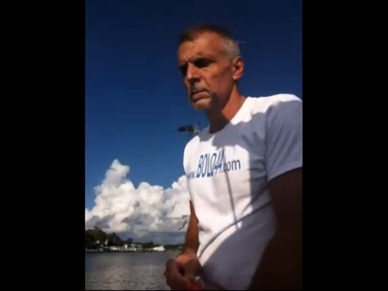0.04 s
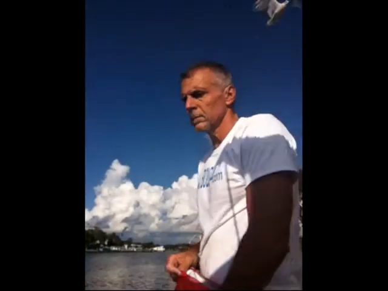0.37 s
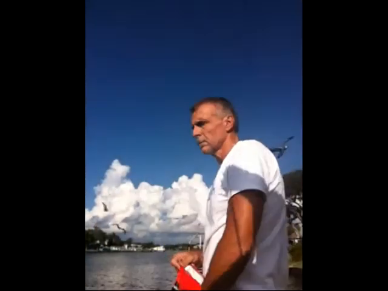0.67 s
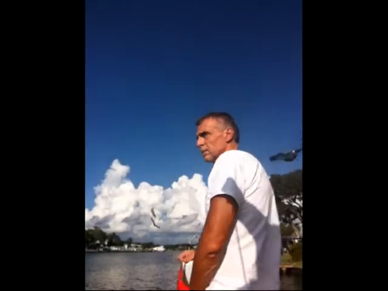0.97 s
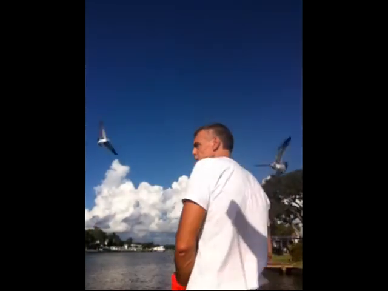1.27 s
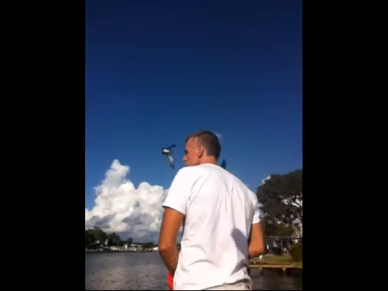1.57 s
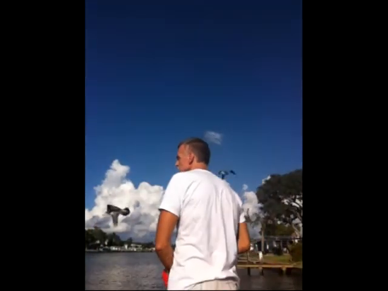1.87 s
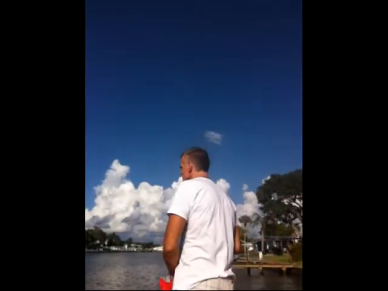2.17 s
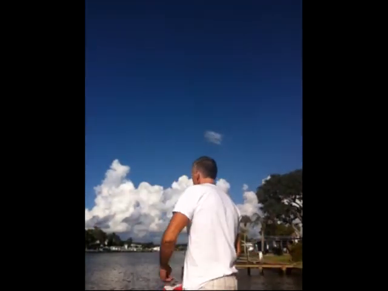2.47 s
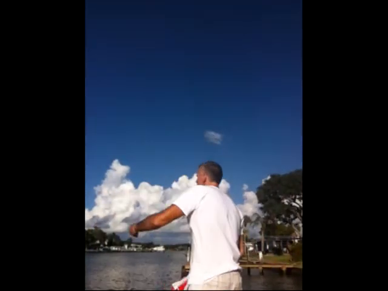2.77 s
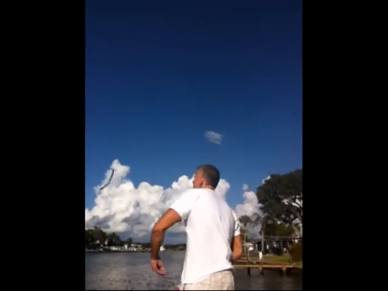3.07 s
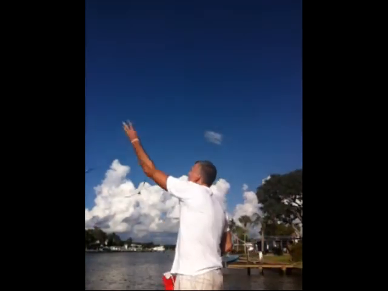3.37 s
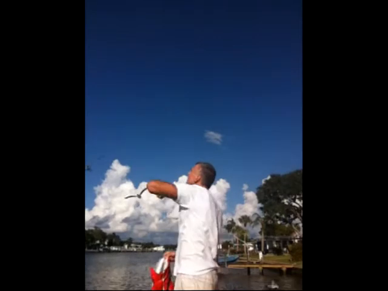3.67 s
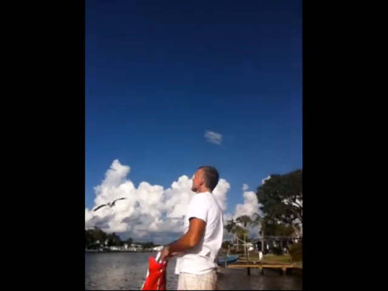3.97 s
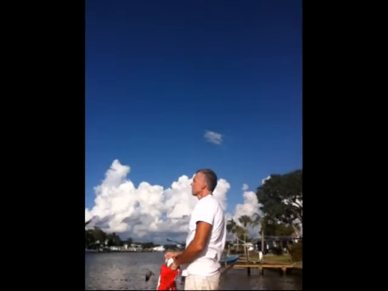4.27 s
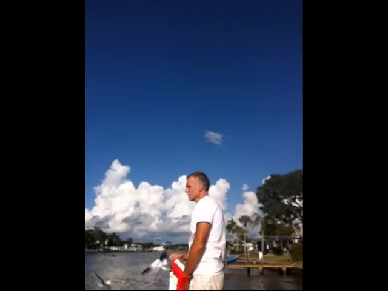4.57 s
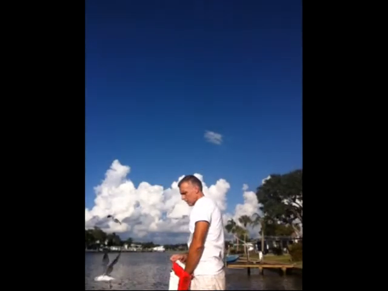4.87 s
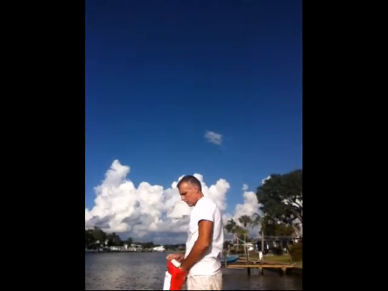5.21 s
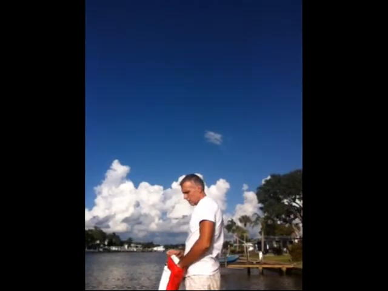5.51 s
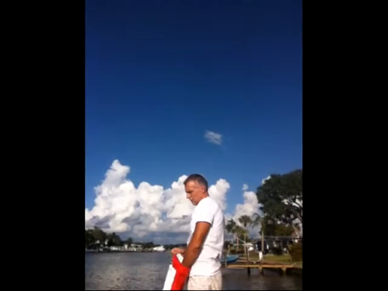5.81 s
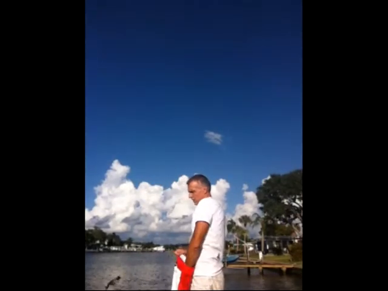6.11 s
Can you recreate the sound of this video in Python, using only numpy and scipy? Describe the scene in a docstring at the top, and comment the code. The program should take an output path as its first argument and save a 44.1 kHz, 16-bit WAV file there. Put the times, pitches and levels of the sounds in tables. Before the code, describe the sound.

Seagulls call throughout over a faint wash of water and air, their cries echoing slightly off the shore. A snack bag crackles in the first half second, with a low puff of wind on the microphone. A young gull squeals thinly at 0.5 seconds, followed by clear mews and another gust. From 1.7 to 2.6 seconds comes a laughing run of short yelps, ending in a sinking wail. Wind rumbles and thumps hardest between 2.6 and 3.4 seconds, among more mews and reedy groans. Around 4 seconds a loud cry and two harsh, close screeches overlap. Near 5 seconds come a yip, a nasal bark and a high warbling whistle. A dull thud lands at 5.1 seconds and a short hollow knock at 5.5. Light bag crinkles, soft clucks, a brief squawk and a peep finish at about 6 seconds.

```python
"""Hungry gulls on the waterfront

Gulls cry for food: long mews, harsh squawks, short yelps and the thin whistles of young birds.
Each call is a harmonic buzz of the syrinx with a breathy rasp, thrown back faintly by the shore.
Gusts buffet the microphone, a snack bag crackles, and a dull thud and a hollow knock come late.
A low wash of water and air lies under it all."""
import sys
import numpy as np
from scipy import signal
from scipy.fft import rfft, irfft, next_fast_len
from scipy.io import wavfile
from scipy.ndimage import uniform_filter1d, map_coordinates

SR = 44100
rng = np.random.default_rng(int(sys.argv[2]) if len(sys.argv) > 2 else 0)


def to_wav(sig):
    """Store sig (one row per channel, or 1-D mono) as 16-bit WAV at the path in sys.argv[1].

    Samples outside -1..1 are clipped; the rate is SR.
    """
    pcm = np.clip(np.atleast_2d(sig), -1, 1) * 32767
    pcm = np.round(pcm).astype(np.int16)
    wavfile.write(sys.argv[1], SR, pcm.T)  # frames by channels


N = 275625
EDGE_HZ = 15900  # top of the spectrum
# an almost unbent gesture for arch(), shared by cracked mews, brays and pips
FLAT_SHAPE = dict(scoop=0.024, drop=0.035, onset_db=-24, end_db=-58,
                  onset_rasp=.05, end_rasp=0.23, fray_db=-14)


def gain_of(db):
    """Decibels to amplitude."""
    return 10 ** (np.asarray(db) / 20)


def evened(x):
    """Scales to rms 1."""
    return x / np.sqrt(np.mean(x ** 2) + 1e-20)


def read(points, hz):
    """Reads an EQ curve on a log-frequency axis."""
    f, value = np.transpose(points)
    return np.interp(np.log(hz + 1), np.log(f + 1), value)


def add(mix, s, sound):
    """Mixes a sound in at time s."""
    part = mix[max(round(s * SR), 0):][:len(sound)]
    part += sound[:len(part)]


def noise(colour, size):
    """Noise at rms 1, coloured by rows of f/Hz, level/dB."""
    n = next_fast_len(size)
    eq = gain_of(read(colour, np.fft.rfftfreq(n, 1 / SR)))
    return evened(irfft(rfft(rng.standard_normal(n)) * eq, n)[:size])


def wander(hz, size):
    """Random modulation up to about hz, rms near 1."""
    knots = rng.standard_normal(4096)
    return map_coordinates(knots, [np.arange(size) * 2 * hz / SR], order=1, mode="wrap") * np.sqrt(3 / 2)


def call(contour, harmonics_db, jitter, rasp_db, tilt_db, beak=((1, 0),), ending_db=None,
         jitter_hz=500, flutter=0.0045, shimmer_db=4.5, split=0.15):
    """The syrinx buzzes, shaking and hissing in puffs as it turns harsh; the beak colours both."""
    open_throat = [(290, -68), (500, -20), (1320, -5), (1440, 7), (2040, -1), (2730, -0.5), (7100, -9.5),
                   (11000, -27), (16000, -30)]  # colour of the hiss: f/Hz, level/dB
    s, *columns = np.transpose(contour)
    t = np.arange(s[0] - .004, s[-1] + .004, 1 / SR)
    hz, level_db, rasp = (np.interp(t, s, c) for c in columns)
    size, harsh = len(t), np.clip(rasp, 0, 1)
    shake = 1 + flutter * wander(57.44, size) + jitter * harsh * wander(jitter_hz, size)
    hz = uniform_filter1d(hz, 260) * shake
    phase = 2 * np.pi * np.cumsum(hz) / SR
    # the timbre morphs towards ending_db, if given
    gains = gain_of(np.linspace(harmonics_db, ending_db or harmonics_db, size).T)
    tone = np.zeros(size)
    for k, gain in enumerate(gains, 1):
        colour = gain_of(2 * wander(22.96, size) + read(beak, k * hz)) * (k * hz < EDGE_HZ)
        tone += gain * colour * np.sin(k * phase + k * k)
    shimmer = evened(gain_of(shimmer_db * harsh * wander(300, size)))
    tone *= np.sqrt(2) / np.linalg.norm(gains, axis=0) * shimmer
    # a strained voice slips in and out of strong-weak cycles
    tone *= evened(1 + split * harsh * wander(44.1, size) * np.cos(phase / 2))
    # tilt_db tips the hiss, per octave
    throat = [(f, db + tilt_db * np.log2(f / open_throat[0][0]) + read(beak, f)) for f, db in open_throat]
    puffs = noise(throat, size) * (1 + 0.53 * np.cos(phase)) * gain_of(1.5 * wander(120, size))
    fade = signal.windows.tukey(size, min(0.009 * SR / size, 1))
    return t[0], fade * gain_of(level_db) * (tone + gain_of(rasp_db) * rasp * puffs)


def voice(contours, harmonics_db, level_db, **throat):
    """One throat sings each contour (t/s, f/Hz, level/dB, rasp) onto one track."""
    out = np.zeros(N)
    for contour in contours:
        add(out, *call(contour, harmonics_db, **throat))
    return gain_of(level_db) * out


def arch(start, length_s, hz, db, rise_s, fall_s, glide, swell_db, rasp,
         scoop, drop, onset_db, end_db, onset_rasp, end_rasp, fray_db):
    """A call's contour: it scoops up, glides and droops, with quiet, hoarse ends."""
    slew_s, catch_share, ease_db = 0.0243, 0.37, 1
    t = np.linspace(0, length_s, 128)
    along = t / length_s - .5
    opening = np.clip(1 - t / rise_s, 0, 1) ** 2
    closing = np.clip(1 - (length_s - t) / fall_s, 0, 1)
    # a weak rasp until the tone catches, part-way up the rise
    toneless = 1 / (1 + abs(t / (catch_share * rise_s)) ** 8)
    # ends quicker than slew_s barely bend the pitch; scoop, drop and glide are shares of it
    bend_in, bend_out = 1 - np.exp(-(np.array([rise_s, fall_s]) / slew_s) ** 2)
    sag = scoop * bend_in * opening + drop * bend_out * np.sin(np.pi / 2 * closing) ** 2
    pitch = hz * (1 + glide * along) * (1 - sag)
    level_db = db + swell_db * along + ease_db * opening + onset_db * toneless + end_db * closing ** 3
    hoarse = rasp * gain_of(fray_db * along) + onset_rasp * bend_in * toneless ** 2
    hoarse += end_rasp * closing ** 2
    return np.transpose([start + t, pitch, level_db, hoarse])


def arches(notes, **shape):
    """Contours for notes: t/s, length/s, f/Hz, level/dB, rise/s, fall/s, glide, swell/dB, rasp."""
    return [arch(*note, **shape) for note in notes]


def mews():
    """Clear mews that ring on the second harmonic, and one cracked mew."""
    clear, cracked = [(.755, 0.38, 1544, -38, 0.037, 0.16, 0.025, -4.5, 0.017),
                      (1.362, 0.14, 1312, -46, 0.07, 0.013, -0.015, -5, 0.036),
                      (1.567, 0.091, 1324, -45, 0.029, 0.028, 0.069, 2, 0.37),
                      (2.58, 0.22, 1590, -45.5, 0.047, 0.085, 0.096, -4, 0.097),
                      (3.024, 0.11, 1548, -34.5, 0.011, 0.0087, 0.056, 9.5, 0.021),
                      (3.143, 0.047, 1570, -38.5, 0.0089, 0.0049, 0.012, 11, 0.07),
                      (3.518, 0.11, 1540, -49.5, 0.016, 0.0089, 0.015, 0, 0.056),
                      (3.674, 0.11, 1536, -43, 0.013, 0.071, -0.018, -12, 0.018),
                      (4.115, 0.18, 1560, -44, 0.027, 0.021, -0.019, -8, 0.037)], [(.752, 0.164, 1015, -46.5, 0.036, 0.021, -0.025, -14, 0.18)]  # notes as in arches()
    clear_db, cracked_db = [-47, 9, -21.5, -2.5, -21, -15, -32, -21.5], [-41, 4.5, -13, -2, -15, -19, -4]  # level/dB per harmonic
    mewing = arches(clear, scoop=0.19, drop=0.19, onset_db=-30.5, end_db=-15,
                    onset_rasp=10.4, end_rasp=0.038, fray_db=-4)
    cracking = arches(cracked, **FLAT_SHAPE)
    return (voice(mewing, clear_db, level_db=1.5, jitter=0.037, rasp_db=-0.5, tilt_db=-2)
            + voice(cracking, cracked_db, level_db=3, jitter=0.047, rasp_db=-6, tilt_db=3))


def wails_and_cries():
    """Strained voices: wails that sink and fray, and short arched cries."""
    wails = [
        [(2.408, 1088, -45, 0.64), (2.421, 1281, -40, 0.54), (2.428, 1358, -28, 0.11), (2.45, 1386, -30, 0.18),
         (2.512, 1321, -28.5, 0.12), (2.535, 1346, -34, 0.28), (2.6, 1320, -36.5, 0.35),
         (2.69, 1254, -42, 0.35), (2.765, 1105, -51, 0.36)],
        [(4.1, 1183, -35, 0.18), (4.12, 1255, -34, 0.18), (4.14, 1291, -29.5, 0.31), (4.184, 1250, -28.5, 0.64),
         (4.198, 1180, -53, .4)],
    ]  # contours: t/s, f/Hz, level/dB, rasp
    cries = [(2.956, 0.083, 1420, -42.5, .03, 0.0074, 0.076, -7, 0.63),
             (3.435, 0.074, 1412, -46, 0.028, 0.0055, 0.1, -19, 0.59),
             (3.874, .225, 1273, -28, .058, 0.0117, -.08, -6.5, 0.059)]  # notes as in arches()
    wail_db, cry_db = [-5.5, 5.5, 0, 2, -2.5, -10, -10, -13, -11, -12.5, -16, -26], [-6.5, 6, 1, -6.5, -10, -14, -16.5, -22, -24, -19, -22, -30]  # level/dB per harmonic
    grain = dict(jitter=.034, jitter_hz=300, rasp_db=-5.5, flutter=.005, shimmer_db=4, split=.7)
    crying = arches(cries, scoop=.14, drop=0.22, onset_db=-17.5, end_db=-26,
                    onset_rasp=0.63, end_rasp=.15, fray_db=-11)
    return (voice(wails, wail_db, level_db=1, tilt_db=11, **grain)
            + voice(crying, cry_db, level_db=-0.4, tilt_db=-7.5, **grain))


def screeches_and_squawks():
    """A close gull screeches twice, its voice tearing; two brief squawks share the timbre."""
    screeches = [
        [(3.992, 430, -36, .4), (4.019, 545.7, -22, 0.44), (4.036, 515, -26.5, 1), (4.06, 483, -26.5, 0.76),
         (4.088, 488, -28, .9), (4.11, 577, -25, 0.55), (4.124, 626, -24, 0.97), (4.138, 620, -36, 0.87)],
        [(4.184, 606, -45, 0.64), (4.199, 576.4, -25, 0.16), (4.235, 531, -33.5, 0.55), (4.278, 392, -41, 1)],
    ]  # contours: t/s, f/Hz, level/dB, rasp
    squawks = [(.45, 0.026, 782, -46.5, 0.0125, 0.0084, 0.32, -4, 0.68),
               (5.885, 0.12, 696, -44, 0.05, 0.055, 0.02, -26.5, 0.67)]  # notes as in arches()
    timbre = [-9.5, 3.5, 8.5, 8.5, 11, 6, 8, 9, -1, 9, 5, -1, 5, -2, -24, -1.5, -4, -6.5, -3]  # level/dB per harmonic
    grain = dict(jitter=.038, jitter_hz=220, rasp_db=-11, flutter=.006, shimmer_db=2, split=.8)
    squawking = arches(squawks, scoop=.3, drop=0.27, onset_db=-13, end_db=-16,
                       onset_rasp=0.2, end_rasp=0.17, fray_db=0)
    return (voice(screeches, timbre, level_db=-0.5, tilt_db=9, **grain)
            + voice(squawking, timbre, level_db=-1, tilt_db=-40, **grain))


def whistle(curve, rasp, strain, low_register_hz=4600):
    """A young bird's contour, hoarser the higher it is pushed."""
    s, hz, level_db = np.transpose(curve)
    return [np.transpose([s, hz, level_db, rasp * (hz / low_register_hz) ** strain])]


def young_birds():
    """A squeal and a warble flip between two registers; a short peep falls away."""
    squeal, warble, peep = [(0.48, 3842, -48), (.504, 4200, -30.5), (.513, 4330, -42), (0.535, 4130, -28),
                            (.567, 4300, -43), (0.598, 4480, -31.5), (.613, 4750, -44), (0.62, 5400, -41),
                            (.655, 5570, -39.5), (0.698, 5400, -40), (.758, 5330, -39.5), (.772, 5280, -33),
                            (0.812, 5180, -39), (0.826, 3910, -33.5), (0.865, 3610, -41)], [(4.916, 4400, -38), (4.932, 4300, -48), (4.944, 3940, -33.5),
                                            (4.957, 3970, -38), (4.966, 4730, -37), (4.993, 5270, -45),
                                            (5.02, 5150, -33.5), (5.05, 5060, -47), (5.1, 5050, -40),
                                            (5.117, 4528, -40), (5.126, 5120, -39), (5.145, 5090, -39.5),
                                            (5.156, 3940, -39.5), (5.163, 3750, -30.5), (5.173, 4950, -46),
                                            (5.193, 4920, -38), (5.201, 3620, -41), (5.223, 3355, -43),
                                            (5.245, 3190, -61)], [(5.93, 4030, -51), (5.948, 3884, -37),
                                                            (5.968, 3650, -49), (5.982, 3020, -43)]  # t/s, f/Hz, level/dB
    squeal_db, whistle_db = [8.5, 0, -20], [7, -4.5, -39]  # level/dB per harmonic
    # beak resonances that the whistles sweep through: f/Hz, level/dB
    squeal_beak, warble_beak = [(5500, 0.5), (8400, -14), (10800, -0.5)], [(3900, 6), (5200, 1), (6200, -6), (7000, 19),
                                                     (9000, -10.5)]
    out = voice(whistle(squeal, rasp=0.244, strain=5.4), squeal_db, level_db=0, beak=squeal_beak,
                jitter=.022, jitter_hz=250, rasp_db=-3.5, tilt_db=11, flutter=.015, split=.35)
    out += voice(whistle(warble, rasp=0.36, strain=0.33), whistle_db, level_db=1.5, beak=warble_beak,
                 jitter=.035, rasp_db=-7, tilt_db=0, flutter=.01, shimmer_db=6, split=.1)
    return out + voice(whistle(peep, rasp=0.53, strain=0.5), whistle_db, level_db=2.5,
                       jitter=0.036, rasp_db=-3, tilt_db=2)


def yip_and_bark():
    """A yip swells into the warble; a nasal bark arches up, sags and breaks apart."""
    yip, bark = [(4.858, 1117, -49, 0.54), (4.868, 1233, -40, 0.5), (4.88, 1208, -32.5, 0.33),
                 (4.885, 1268, -31.5, 0.13), (4.9, 1281, -27, 0.13), (4.907, 1330, -45, .3),
                 (4.915, 1360, -59, .4)], [(4.966, 410.5, -50, 0.34), (4.976, 440, -28, 0.11), (5.009, 487, -29, .08),
                              (5.022, 468, -24.5, 0.18), (5.037, 424, -35, 0.24), (5.05, 385.6, -35, 0.33),
                              (5.074, 457, -39.5, 0.86), (5.108, 390, -54, .9)]  # t/s, f/Hz, level/dB, rasp
    yip_db, bark_db = [-37, -4.5, -1, -16, -6.5, -20, -21.5, -32], [-6.5, -23, -7, 8.5, 1.5, 3.5, -0.5, 3, 3, -12, -8, -8, -4]  # level/dB per harmonic
    return (voice([yip], yip_db, level_db=1.5, jitter=0.046, rasp_db=-10, tilt_db=8)
            + voice([bark], bark_db, level_db=-3.5, jitter=0.087, rasp_db=-0.5, tilt_db=4.5))


def brays_and_groans():
    """Low, reedy voices: brays hold their pitch and shift colour, groans sag at the end."""
    brays, groans = [(3.112, .18, 636.7, -38, 0.0287, 0.0296, -0.0122, 9, 0.17),
                     (3.585, 0.15, 639.6, -43, 0.018, 0.035, 0.027, -1, 0.047)], [(2.765, .11, 607, -40, 0.035, 0.028, -0.033, 0, 0.22),
                                    (3.262, 0.074, 618, -38, 0.0093, 0.066, -0.11, 1, 0.49),
                                    (3.725, .072, 609, -48.5, 0.0052, 0.034, -0.076, -13, 0.49)]  # notes as in arches()
    # level/dB per harmonic
    bray_db, bray_end_db, groan_db = [-26, -28, 1, -28, 0, -12, -1, -1, -8, -8, -26], [-26, -28, 2, -28, -12, 5, -24, -22, -3, -28, -36], [-20, -18, 6, -9, 8.5, 4, 0, -2,
                                                                            -22, -21, -19]
    braying = arches(brays, **FLAT_SHAPE)
    groaning = arches(groans, scoop=0.0079, drop=0.48, onset_db=-23, end_db=-32,
                      onset_rasp=.05, end_rasp=0.43, fray_db=8)
    return (voice(braying, bray_db, ending_db=bray_end_db, level_db=-1,
                  jitter=0.076, rasp_db=-19, tilt_db=5)
            + voice(groaning, groan_db, level_db=-1, jitter=0.038, rasp_db=-11, tilt_db=7))


def yelps():
    """A laughing run; midway through each note the voice gives way to a whistled pip."""
    notes = [(1.74, 3670, -42, -49.5), (1.896, 3730, -41, -45), (2.056, 3803, -39, -45),
             (2.211, 3900, -36.5, -50.5), (2.37, 3850, -37, -56), (2.553, 4040, -39.5, -54)]  # t/s, pip f/Hz, voice level/dB, pip level/dB
    # level/dB per harmonic
    timbre, end_timbre, pip_timbre = [-13, -2.5, 16, -19, 3.5, -0.5, -18], [-8, -6, 4.5, 0, 9.5, 3, -14], [-36, -16, -35, -13.5, 3, -29,
                                                                            -28, -33, -24, -11, -20]
    break_s, break_width_s, break_db = 0.049, 0.019, -34
    voice_share, pip_harmonic, pip_delay_s = .149, 5, 0.029
    laughs, pips = [], []
    for start, pip_hz, voice_db, pip_db in notes:
        s, hz, level_db, rasp = arch(
            start, length_s=.094, hz=voice_share * pip_hz, db=voice_db, rise_s=.036, fall_s=.036,
            glide=.02, swell_db=-4, rasp=.25, scoop=0.159, drop=0.2, onset_db=-18, end_db=-20,
            onset_rasp=0.6, end_rasp=.3, fray_db=0).T
        broken = np.exp(-((s - start - break_s) / break_width_s) ** 2)
        laughs.append(np.transpose([s, hz, level_db + break_db * broken, rasp]))
        pips.append(arch(start + pip_delay_s, length_s=0.04, hz=pip_hz / pip_harmonic, db=pip_db,
                         rise_s=0.0081, fall_s=0.01, glide=-0.01, swell_db=2, rasp=0.25, **FLAT_SHAPE))
    return (voice(laughs, timbre, ending_db=end_timbre, level_db=3.5,
                  jitter=0.045, rasp_db=3.5, tilt_db=-0.5)
            + voice(pips, pip_timbre, level_db=5, jitter=.016, jitter_hz=250,
                    rasp_db=-7, tilt_db=-7, flutter=.005, shimmer_db=6))


def clucks():
    """Soft, dark clucks, each a steep arch of pitch."""
    notes = [(4.412, 676, -56.5), (5.585, 644, -65), (5.715, 653, -57.5), (5.895, 720, -56),
             (6.06, 689, -58)]  # t/s, f/Hz, level/dB
    timbre = [6.5, 5.5, -2.5, -4.5, -45]  # level/dB per harmonic
    shape = dict(length_s=.088, rise_s=0.05, fall_s=0.038, glide=0.051, swell_db=11, rasp=0.78,
                 scoop=0.37, drop=0.33, onset_db=-12, end_db=-78,
                 onset_rasp=0.96, end_rasp=0.34, fray_db=-17)
    contours = [arch(s, hz=hz, db=db, **shape) for s, hz, db in notes]
    return voice(contours, timbre, level_db=13.5, jitter=0.054, rasp_db=-34, tilt_db=-13)


def shore(x, tail_db=-10.5, echo_db=-27.0, echo_s=0.12):
    """One blurred slap from the bank, and a thin tail from trees and houses."""
    decay = [(300, 0.62), (14000, 0.36)]  # f/Hz, t60/s
    t = np.arange(SR) / SR
    taps = rng.standard_normal(SR) * (rng.random(SR) < 2500 / SR) * (t > .008)
    hz, when, spectra = signal.stft(taps, SR, nperseg=256)
    damping = gain_of(-60 * when / read(decay, hz)[:, None])
    tail = signal.istft(spectra * damping, SR, nperseg=256)[1][:SR]
    slap = taps[::-1] * np.exp(-((t - echo_s) / 0.0012) ** 2)
    slap = signal.lfilter(*signal.butter(1, 5000, fs=SR), slap)
    response = gain_of(tail_db) * evened(tail) + gain_of(echo_db) * evened(slap)
    return signal.fftconvolve(x, response / np.sqrt(SR))[:N]


def wind(level_db=1.0, lumps_db=5.5, buffet_db=1.5, breeze_db=-57.5, depth_db=22.5):
    """Lumpy low turbulence on the microphone follows the gusts; the hardest eddies land as thumps."""
    gusts = [(.215, -35.5, 0.17, 0.13), (1.09, -36, 0.16, 0.13), (1.251, -37, 0.053, 0.043),
             (1.98, -51, 0.3, 0.11), (2.39, -37.5, 0.097, 0.19), (2.63, -39, 0.18, 0.027),
             (2.831, -33.5, 0.22, 0.17), (3.203, -32, 0.23, 0.1), (3.375, -31.5, 0.14, 0.068),
             (4.46, -44, 0.036, 0.21), (6.19, -41, 0.24, 0.076)]  # peak t/s, level/dB, build/s, die/s (both across depth_db)
    rumble = [(30, -39), (76, -17.5), (124, -1.5), (178, -3), (265, -11), (596, -31.5), (1980, -120)]  # f/Hz, level/dB
    buffets = [(0.21, -25, 148), (2.629, -21.5, 175), (2.84, -19.5, 155), (3.206, -16, 184),
               (3.36, -32, 149), (3.377, -21, 188)]  # t/s, level/dB, f/Hz
    now = np.arange(N) / SR
    power = gain_of(breeze_db) ** 2
    for s, db, build, die in gusts:
        away = np.maximum((s - now) / build, (now - s) / die)
        power = power + gain_of(db - depth_db * away) ** 2
    out = noise(rumble, N) * gain_of(level_db) * np.sqrt(power)
    out *= evened(gain_of(lumps_db * np.tanh(wander(30, N))))
    t = np.arange(-.02, .02, 1 / SR)
    for s, db, hz in buffets:
        thump = np.sin(2 * np.pi * hz * t) * np.exp(-abs(t) * hz / 0.31)
        add(out, s + t[0], gain_of(db + buffet_db) * thump)
    return out


def bag(level_db=-3.5, snap_s=0.00082, rustle_db=-3.0, rustle_s=0.0055, small_db=-59.0):
    """Folds of foil snap, each with a short rustle; tiny crackles fall between as the bag is handled."""
    crackles = [(0.0275, -29, 6600), (0.19, -38, 1420), (0.2276, -37.5, 2370), (0.285, -36, 3390),
                (0.375, -36, 1700), (4.3543, -36.5, 6040), (4.5407, -34, 2310), (5.129, -34, 1780),
                (5.815, -37, 2120), (6.13, -34, 1310)]  # t/s, level/dB, centre f/Hz
    handling = [(0, 110), (.5, 12), (4.2, 6), (4.5, 30), (6.2, 60)]  # t/s, tiny crackle rate/Hz
    out, t = np.zeros(N), np.arange(2048) / SR
    envelope = np.exp(-t / snap_s) + gain_of(rustle_db) * np.exp(-t / rustle_s)
    for s, db, hz in crackles:
        colour = [(hz / 8, -16), (hz / 2, -2), (hz, 0), (hz * 4, -13)]
        add(out, s, gain_of(db + level_db) * envelope * noise(colour, len(t)))
    per_s = np.interp(np.arange(N) / SR, *np.transpose(handling))
    ticks = (rng.random(N) < per_s / SR) * gain_of(6.5 * np.minimum(rng.exponential(1, N), 3))
    tiny_snap = envelope * noise([(300, -5), (2000, 7), (15000, -19.5)], len(t))
    return out + gain_of(small_db) * signal.oaconvolve(ticks, tiny_snap)[:N]


def knock():
    """A short hollow knock in the middle of a soft rustle."""
    s, db, hz, t60 = (5.496, -26, 980, .035)  # t/s, level/dB, f/Hz, t60/s
    out, t = np.zeros(N), np.arange(-.04, .06, 1 / SR)
    strike = np.clip(t / .001, 0, 1) * gain_of(-60 * abs(t) / t60)
    rustle = noise([(200, -14), (900, 0), (5000, -15), (15000, -27)], len(t))
    rustle *= .35 * strike + .1 * np.exp(-abs(t) / .02)
    add(out, s + t[0], gain_of(db) * (strike * np.sin(2 * np.pi * hz * t) + rustle))
    return out


def thud(attack_s=0.0043):
    """A close, dull bump that dies quickly."""
    s, db, decay_s = (5.13, -35, 0.034)  # t/s, level/dB, decay/s
    colour = [(60, -22), (250, 0), (520, -3), (900, -15), (2500, -40)]  # f/Hz, level/dB
    out, t = np.zeros(N), np.arange(8192) / SR
    envelope = np.minimum(t / attack_s, 1) * np.exp(-t / decay_s)
    add(out, s, gain_of(db) * envelope * noise(colour, len(t)))
    return out


def wash(level_db=-53.2, swell_db=1.6, flicker_db=1.5):
    """A bed of lapping water and air, swelling slightly."""
    colour = [(25, -37), (53, -12), (123, -18), (229, 1), (354, -4.5), (818, -6.5), (1560, -13.5),
              (4490, -17), (13600, -24.5), (16000, -30)]  # f/Hz, level/dB
    bed = gain_of(level_db) * noise(colour, N)
    return bed * gain_of(swell_db * wander(3.027, N) + flicker_db * wander(25, N))


def scene():
    """The flock and its echo over wind, bag, bumps and water."""
    flock = (mews() + wails_and_cries() + screeches_and_squawks() + young_birds()
             + yip_and_bark() + brays_and_groans() + yelps() + clucks())
    return (flock + shore(flock) + wind() + bag() + knock() + thud() + wash())[None]


def record(dry):
    """A steep high cut on the whole mix."""
    high_cut = signal.firwin(511, EDGE_HZ, window=("kaiser", 9), fs=SR)
    return signal.oaconvolve(dry, high_cut[None], "same")


dry = scene()
out = record(dry)
to_wav(out)
```